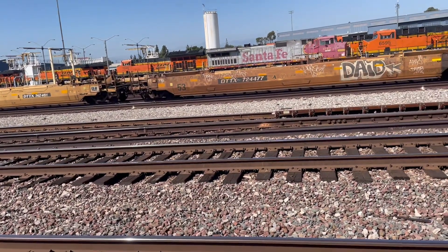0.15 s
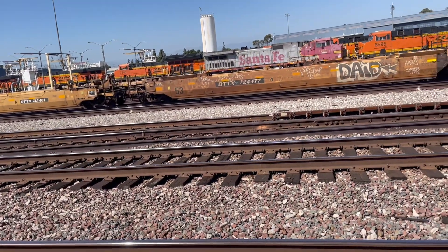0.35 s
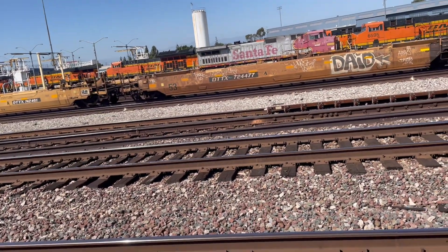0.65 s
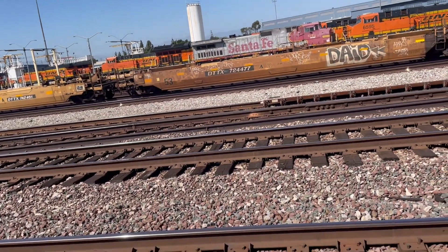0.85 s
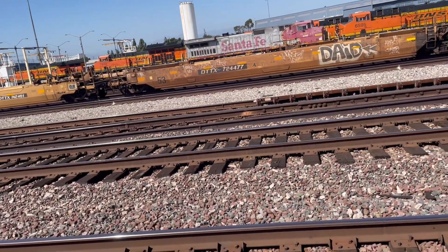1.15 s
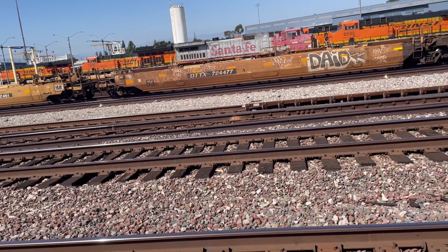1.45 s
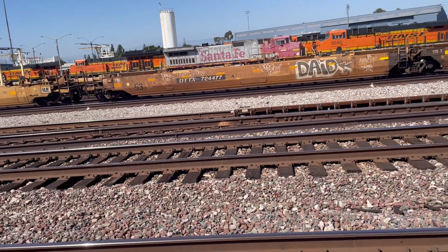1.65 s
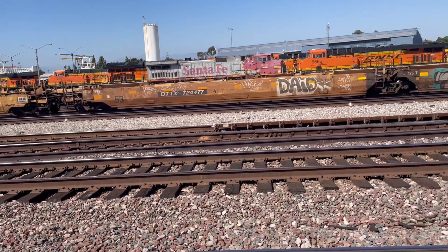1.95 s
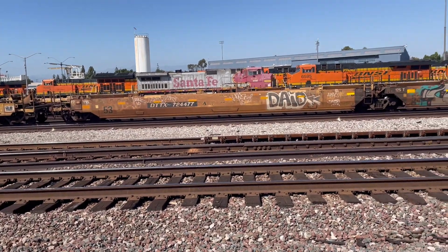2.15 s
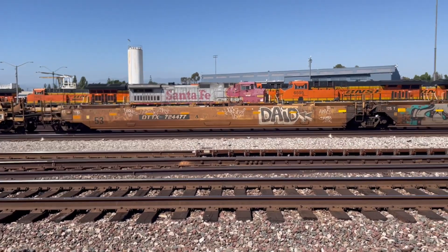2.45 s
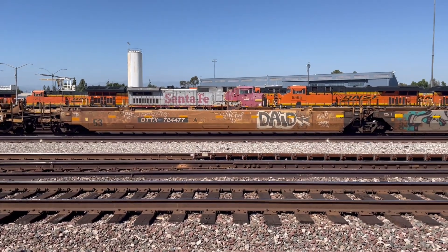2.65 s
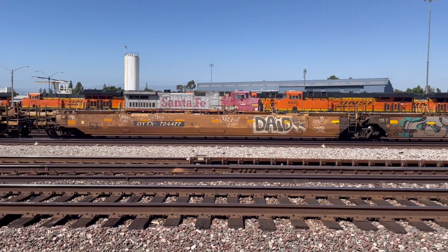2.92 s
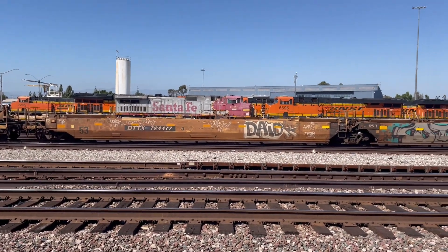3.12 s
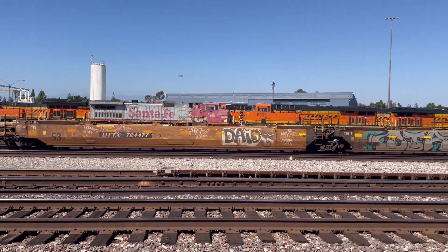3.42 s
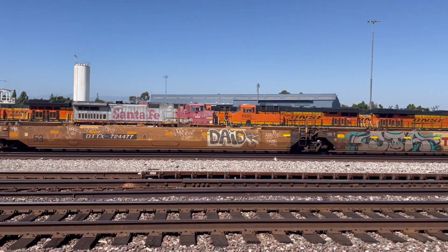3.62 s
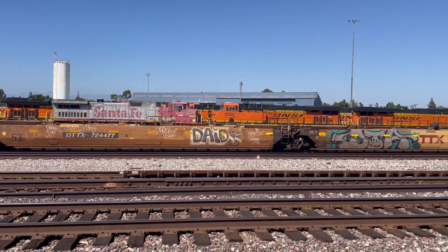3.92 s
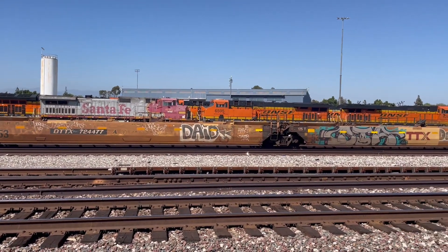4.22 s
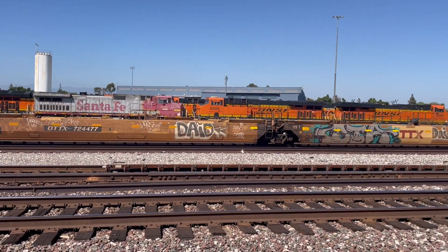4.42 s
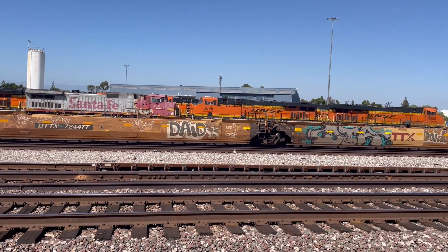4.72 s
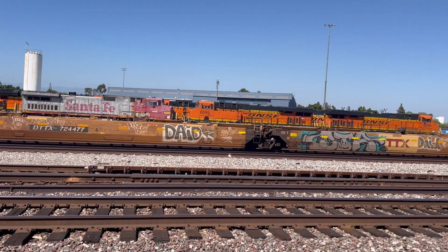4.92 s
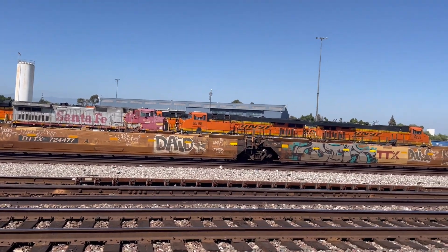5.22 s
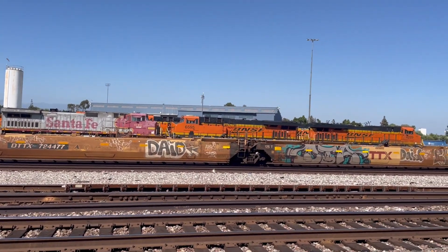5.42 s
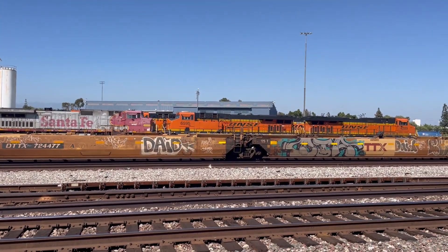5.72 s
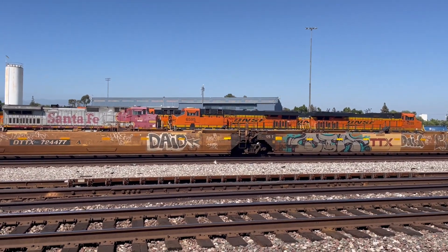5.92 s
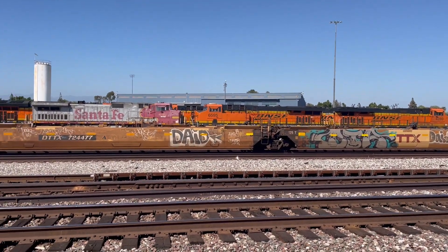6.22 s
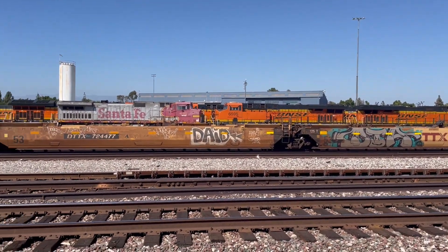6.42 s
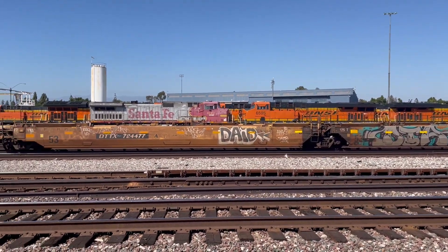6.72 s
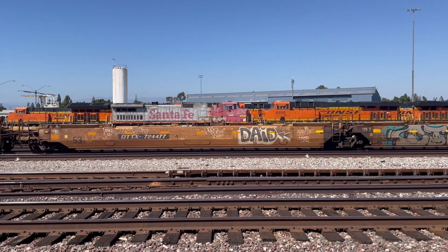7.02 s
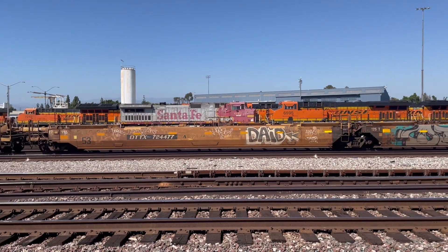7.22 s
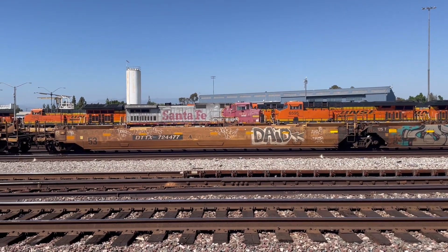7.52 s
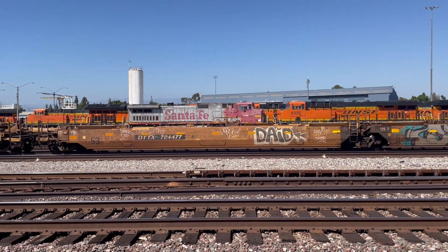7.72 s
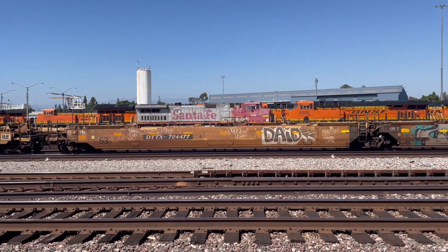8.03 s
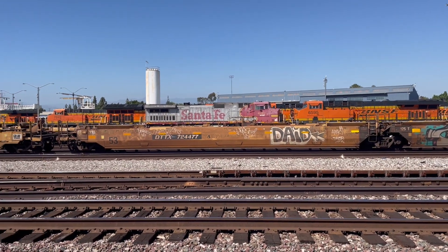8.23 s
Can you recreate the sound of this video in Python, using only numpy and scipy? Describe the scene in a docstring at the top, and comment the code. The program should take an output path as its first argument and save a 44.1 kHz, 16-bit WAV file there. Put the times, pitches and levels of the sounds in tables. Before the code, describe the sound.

Deep, pulsing diesel rumble and the even noise of steel wheels carry across an open rail yard as a freight train rolls slowly along. Wind hits the microphone in irregular low thumps, with stronger buffeting late on. Underneath are a soft wavering whine, faint bird chirps and two runs of dry ticking close by. A short hiss of escaping air comes near the end.

```python
"""A freight train creeps through a rail yard, heard on a stereo microphone several tracks away.
Its diesels throb and beat against each other over the roar of rolling wheels and a blower's whine.
Wind thumps and flutters on the microphone, compressed air hisses off to the left and something dry
rattles close by. A faint sizzle passes, and small birds chip and twitter in the background."""
import sys
import numpy as np
from scipy import signal
from scipy.fft import rfft, irfft, next_fast_len
from scipy.io import wavfile
from scipy.ndimage import uniform_filter1d, map_coordinates

SR = 44100
rng = np.random.default_rng(int(sys.argv[2]) if len(sys.argv) > 2 else 0)


def wav_out(sig):
    """Save sig, one row per channel (or a flat mono array), as 16-bit PCM at SR to the path in sys.argv[1]."""
    wavfile.write(sys.argv[1], SR, np.round(np.clip(np.atleast_2d(sig).T, -1, 1) * 32767).astype(np.int16))


N = 368676

# left-right likeness of the engine rumble and wheel roar in the stereo image: f/Hz, coherence
TRAIN_COHERENCE = [(60, 0.88), (120, 0.98), (240, 1), (470, 0.25), (950, 0.44), (1400, 0.27), (2200, 0.27),
                   (6500, 0.11), (8600, -0.57), (12000, 0.018)]
# left-right likeness of the air hiss and dry rattle in the stereo image: f/Hz, coherence (clipped to -1)
HISS_COHERENCE = [(2000, 0.21), (3500, -0.19), (4500, .1), (5600, 0.088), (6700, 0.22), (7700, -0.73),
                  (8700, -1.5), (10400, -0.14), (12000, .8)]


def diesels():
    """The loudest diesel throbs evenly, swelling the rumble; idling ones beat against its exhaust tone."""
    # the loudest exhaust tone and its sidebands: offset/pulse rates, relative level/dB
    lead_tones = [(-1, -33.5), (0, -27.5), (1, -30)]
    idling_tones = [(37.4, -44), (45.5, -38.5), (50.4, -33), (51.8, -29.5), (53.65, -39), (58.3, -37.5),
                    (60.15, -37.5), (65.0, -33.5), (105.6, -49), (136.6, -45)]  # exhausts of the other diesels: f/Hz, relative level/dB
    rumble_spectrum = [(15, -30.5), (25, -28.5), (38, 8), (48, 7.5), (62, -20), (80, 8), (105, 0),
                       (150, -6), (220, -18), (320, -19.5), (500, -30.5), (900, -66), (3000, -100)]  # bed of engine rumble: f/Hz, level/dB
    strength = [(0, -16.5), (.5, -3.5), (1.8, -2), (3.2, 1.5), (5.5, 1), (7.4, -.5), (8.36, 1.5)]  # all the engines together: t/s, gain/dB
    lead_hz, pulse_hz, first_throb_s, swing_db = 55.26, 8.12, .012, 4
    pulse = 2 * np.pi * pulse_hz * (clock() - first_throb_s)
    exhaust = 2 * np.pi * (np.cumsum(lead_hz + .05 * wobble(1)) / SR + rng.random())
    lead = sum(np.sqrt(2) * amp(db) * np.sin(exhaust + step * pulse) for step, db in lead_tones)
    others = sum(amp(db + 0.45 * wobble(1.9)) * sine(hz + 0.038 * wobble(0.923))
                 for hz, db in idling_tones)
    rumble = coloured(noise(patchy_db=0.5), rumble_spectrum, TRAIN_COHERENCE)
    rumble *= amp(-33 + swing_db * np.cos(pulse))
    return amp(curve(strength) + .7 * wobble(5)) * (lead + others + rumble)


def wheels():
    """Steel wheels roar on the rails, from both ends of the train and all around; their flanges rasp."""
    roar_spectrum = [(100, -23.5), (250, 4.5), (430, 1.5), (590, -4.5), (700, 0), (930, 0), (1130, -4.5),
                     (1280, -8), (1750, -10.5), (2200, -19), (3600, -24), (5000, -27), (6900, -31),
                     (8800, -43.5), (12400, -42), (14000, -67)]  # wheels on rails: f/Hz, level/dB
    roll_level = [(0, -44), (.6, -45.5), (1.2, -43), (3.7, -44.5), (6.8, -42.5), (8.36, -42.5)]  # rolling roar: t/s, relative level/dB
    train_ends = [(-.18, -6), (.44, -7)]  # right end, left end: lag at the right port/ms, relative level/dB
    flange_level = [(0, -70.5), (2.4, -62), (5, -57.5), (6.4, -52), (7.5, -60.5), (8.36, -59)]  # flanges rubbing on the rail: t/s, level/dB
    around = amp(-2.5) * coloured(noise(patchy_db=3), roar_spectrum, TRAIN_COHERENCE)
    direct = sum(amp(db) * beam(roar_spectrum, lag_ms) for lag_ms, db in train_ends)
    roar = amp(curve(roll_level) + 3.5 + 0.26 * wobble(10)) * (around + direct)
    rasp_spectrum = [(700, -34), (1200, -6.5), (1750, 2.5), (2900, -4), (3800, -14.5), (7000, -44.5)]
    rasp = coloured(noise(patchy_db=2.5), rasp_spectrum, coherence=[(2000, 0.15)])
    return roar + amp(curve(flange_level)) * rasp * pan(left_db=0.5)


def blower_whine():
    """A blower's harmonics waver and fade in and out; their echoes off the wagons differ at each port."""
    harmonics = [(2, -59), (3, -66.5), (4, -46), (5, -55.5), (6, -53.5), (8, -53), (9, -55), (10, -60.5)]  # partials of the whine: harmonic number, relative level/dB
    carry = [(0, -2.5), (1.1, 0), (1.5, 2), (5.6, 1), (6.4, -1), (7.3, -1.5), (8.36, 0.5)]  # how well it carries across the yard: t/s, gain/dB
    fundamental_hz = 116.5
    pitch = fundamental_hz * (1 + 0.0045 * wobble(20))
    fading = lambda: amp(-7.2 + 5 * np.tanh(wobble(13)))
    echo = lambda hz: amp(-9) * (wobble(24) * sine(hz) + wobble(45) * sine(hz))
    direct = sum(amp(db) * fading() * sine(k * pitch) for k, db in harmonics)
    scattered = [sum(amp(db) * echo(k * pitch) for k, db in harmonics) for _ in range(2)]
    return amp(curve(carry)) * (direct + np.array(scattered))


def wind():
    """The breeze flutters over the microphone; gusts buffet each port separately, the right one harder."""
    breeze_level = [(0, -49), (.35, -40), (.7, -40.5), (1.1, -41.5), (2, -30), (2.4, -34), (3.3, -28.5),
                    (5.1, -41.5), (6.3, -27.5), (7.1, -36), (8.36, -34.5)]  # breeze on the microphone: t/s, level/dB
    flutter_spectrum = [(30, -14), (70, 9.5), (140, -5.5), (250, -7.5), (400, -22), (700, -28), (1500, -64),
                        (4000, -100)]  # its flutter: f/Hz, level/dB
    gusts = [(1.33, -40.5, 0.093), (2.53, -32.5, 0.032), (3.22, -35.5, 0.067), (4.48, -35, 0.18),
             (6.0, -34.5, 0.38), (6.8, -23, 0.19), (7.6, -25, 0.21), (8.18, -24, 0.11)]  # gusts on the ports: t/s, level/dB, half-width/s
    gust_spectrum = [(18, -20.5), (45, -8.5), (90, 2.5), (150, -17), (300, -19), (700, -39), (3000, -100)]
    lull_db, lull_swing_db = -37, 4.5  # buffeting between gusts
    ripple = amp(5 * np.tanh(wobble(35)))
    lumps = amp(3 * np.tanh([wobble(14), wobble(14)]))
    flutter = unit(ripple * coloured(noise(patchy_db=2), flutter_spectrum, coherence=[(100, 1)]))
    buffeting = unit(lumps * coloured(noise(patchy_db=5), gust_spectrum, coherence=[(100, -0.63)]))
    force = amp(lull_db + lull_swing_db * wobble(1)) + swells(gusts)
    return amp(curve(breeze_level)) * flutter + force * buffeting * pan(left_db=-5)


def eddies():
    """Each eddy thumps the microphone, falling in pitch as it dies, with a ragged wake of turbulence."""
    hits = [(0.114, -23.5, 413), (0.151, -24.5, 311), (0.199, -29.5, 400), (.241, -26.5, 475),
            (0.279, -23.5, 576), (0.354, -25.5, 555), (0.409, -24.5, 338), (0.898, -23.5, 463),
            (0.965, -18, 377), (1.019, -28.5, 387), (1.252, -22, 296), (1.343, -27, 332),
            (1.386, -20.5, 420), (1.43, -34, 345), (1.581, -21.5, 318), (1.609, -20.5, 440),
            (1.698, -14.5, 334), (1.804, -20.5, 344), (1.904, -18.5, 337), (1.999, -17.5, 302),
            (2.069, -17, 279), (2.491, -13.5, 364), (2.602, -16, 307), (2.662, -17, 263),
            (3.14, -20.5, 303), (3.18, -12, 331), (4.243, -21, 327), (4.457, -12, 348), (4.468, -18, 317),
            (4.541, -12.5, 316), (4.547, -23.5, 617), (4.874, -21, 279), (5.867, -17, 264),
            (6.026, -10, 199), (6.161, -13, 131), (6.272, -11.5, 164.5), (6.688, -20, 378),
            (6.781, -19, 293), (8.058, -9.5, 333), (8.119, -9, 409), (8.163, -18.5, 241)]  # eddies striking the microphone: t/s, relative level/dB, starting f/Hz
    trail_s, trail_db, trail_ratio = .022, -7.5, .65  # each drags a weaker, lower one behind it
    delays = trail_s * (.5 + rng.random(len(hits)))
    trailing = [(s + delay, db + trail_db, hz * trail_ratio) for (s, db, hz), delay in zip(hits, delays)]
    thumps, wake = np.zeros(N), np.zeros(N)
    t = np.arange(SR // 6) / SR
    for s, db, hz in hits + trailing:
        pitch = 65 + (hz - 65) * np.exp(-t / 0.00789)
        push = (1 - np.exp(-t / 0.0031)) * np.exp(-t / 0.021)
        add(thumps, s, amp(db - 2.5) * push * sine(pitch))
        add(wake, s, amp(db - 4) * (1 - np.exp(-t / 0.0064)) * np.exp(-t / 0.018))
    wake_spectrum = [(35, -25), (80, 7.5), (170, -0.5), (320, -23.5), (500, -31.5), (1200, -63.5),
                     (3000, -100)]
    return thumps + wake * coloured(noise(patchy_db=1.5), wake_spectrum, coherence=[(100, 0.91)])


def flurries():
    """Fine turbulence on the microphone joins the eddies into a rolling flutter."""
    bursts = [(.16, -39, 0.032), (.27, -33.5, 0.018), (.4, -39.5, 0.051), (.98, -33.5, 0.05),
              (1.24, -35, 0.039), (1.41, -33, 0.035), (1.73, -28.5, 0.014), (2.53, -37.5, 0.013),
              (4.52, -34, .03), (5.98, -36, 0.056)]  # flurries: t/s, level/dB, half-width/s
    spectrum = [(60, -21), (140, 4.5), (320, -3.5), (520, -15.5), (900, -22.5), (3000, -86)]  # fine turbulence: f/Hz, level/dB
    tumble = amp(4 * np.tanh(wobble(60)))
    turbulence = coloured(noise(patchy_db=5), spectrum, coherence=[(100, 0.84)])
    return swells(bursts) * unit(tumble * turbulence)


def compressed_air():
    """Air leaks off to the left and escapes in surges; a bright spray rises and falls with the flow."""
    surges = [(6.09, 0.25, -54), (6.56, 0.089, -55), (7.485, 0.18, -41.5), (7.8, 0.2, -49),
              (8.24, 0.15, -52)]  # escapes of air: start t/s, time open/s, relative level/dB
    jet_spectrum = [(500, 4.5), (1200, 9.5), (1700, 1), (2300, 6), (3500, 3), (5200, 3), (6500, -5.5),
                    (8000, -11.5), (10000, -21.5), (12400, -25), (14000, -50.5)]  # hiss of the jet: f/Hz, level/dB
    spray_spectrum = [(3000, -10), (6500, -1), (8500, -5), (10000, -2.5), (12400, -10), (13500, -31)]
    attack_s, release_s, leak_db = 0.091, 0.11, -62.5
    spray_db, reference_flow_db = -47.5, -34  # the spray has this level at this flow
    flow = amp(leak_db)
    for s, open_s, db in surges:
        t = np.maximum(clock() - s, 0)
        build = 1 - np.exp(-t / attack_s)
        release = np.exp(-np.maximum(t - open_s, 0) / release_s)
        flow = flow + amp(db) * build * release
    around = amp(0.5) * coloured(noise(patchy_db=5.5), jet_spectrum, HISS_COHERENCE)
    direct = amp(-2.5) * beam(jet_spectrum, lag_ms=.27)
    jet = flow * amp(.5 * wobble(25) + .8 * wobble(180)) * (around + direct)
    spray_gain = amp(spray_db + 2.5 * wobble(60)) * (flow / amp(reference_flow_db)) ** 0.91
    spray = spray_gain * coloured(noise(patchy_db=4.5), spray_spectrum, HISS_COHERENCE)
    return (jet + spray) * pan(left_db=3)


def rattle():
    """Something loose and dry rattles close by; each tick is a burst of tiny clicks with a soft tail."""
    hits = [(1.194, -54.5), (1.244, -51), (1.265, -53), (1.376, -62), (1.573, -49), (1.594, -51),
            (1.64, -51), (1.695, -49), (1.744, -53), (1.97, -51), (1.998, -47.5), (2.035, -47),
            (2.078, -47.5), (2.137, -49), (2.202, -53), (2.256, -57), (2.313, -53), (2.39, -55),
            (2.42, -50), (2.477, -52), (6.306, -50), (6.342, -51), (6.7, -53), (6.73, -44.5), (6.785, -46),
            (6.839, -53), (7.009, -50.5), (7.068, -58), (7.112, -49.5), (7.133, -48.5), (7.178, -50.5),
            (7.232, -48)]  # runs of ticks: t/s, level/dB
    rustles = [(1.6, -61, 0.073), (2.2, -54, 0.25), (3.05, -56, 0.067), (3.392, -52, 0.04),
               (5.42, -53, 0.055)]  # soft rustles of the same dry stuff: t/s, level/dB, half-width/s
    spectrum = [(700, 2), (1700, 7.5), (2500, -1), (4400, -0.5), (6500, -9), (8500, -10.5), (10500, -13),
                (12400, -21), (14000, -41)]  # the dry clicks: f/Hz, level/dB
    clicks_per_s, tick_half_s, tail_s, tail_db = 5000, 0.0095, 0.0085, -10
    clicks = rng.standard_normal((2, N)) * (rng.random(N) < clicks_per_s / SR)
    grit = amp(wobble(150))
    ticks = swells([(s, db, tick_half_s) for s, db in hits])
    tails = swells([(s + tail_s, db + tail_db, tail_s) for s, db in hits])
    envelope = np.sqrt(ticks ** 2 + tails ** 2 + swells(rustles) ** 2)
    return envelope * unit(grit * coloured(clicks, spectrum, HISS_COHERENCE))


def chipping_bird():
    """A small bird in the yard repeats a pair of short, falling chips."""
    calls = [(.183, -60), (.53, -60), (.883, -62), (1.237, -59), (2.313, -58), (2.682, -58), (3.031, -61),
             (3.452, -59), (3.837, -56), (4.183, -61), (4.575, -57), (4.923, -60), (6.86, -61), (7.27, -61)]  # double chips: t/s, level/dB
    chip_s, spacing_s = .017, .052
    chips = np.zeros(N)
    progress = np.linspace(0, 1, int(chip_s * SR))
    for s, db in calls:
        for delay in (0, spacing_s):
            pitch = (4830 - 480 * progress ** 0.81) * (1 + 0.0092 * rng.standard_normal())
            add(chips, s + delay, amp(db + rng.standard_normal()) * np.sin(np.pi * progress) * sine(pitch))
    return chips


def whistling_bird():
    """A second bird, on the left, whistles once in an arch of pitch."""
    start_s, length_s = 5.592, .092
    top_s, top_hz, half_width_s = 5.63, 4480, .06
    arch = top_hz * np.exp(-.5 * ((clock() - top_s) / half_width_s) ** 2)
    progress = np.clip((clock() - start_s) / length_s, 0, 1)
    return amp(-56) * np.sin(np.pi * progress) * sine(arch + 70 * wobble(360)) * pan(left_db=12.5)


def far_birds():
    """Farther off, birds twitter in short, blurred notes whose pitch and level shake fast."""
    notes = [(0.412, -65, .008, 4600), (6.17, -63, 0.011, 4520), (6.582, -60, .018, 4700),
             (6.988, -58, .018, 4520), (7.237, -55.5, 0.0091, 4800), (7.468, -59, .009, 4830),
             (8.234, -59, 0.01, 4750)]  # twitters: t/s, level/dB, half-width/s, f/Hz
    shake_hz = 170
    return sum(swells([(s, db, half)]) * amp(2.5 * wobble(150)) * sine(hz + shake_hz * wobble(700))
               for s, db, half, hz in notes)


def sizzle():
    """A run of faint, scratchy spits in a soft hiss at the top of the treble."""
    spits = [(2.535, -73.5, 0.012), (2.594, -62, 0.013), (2.632, -72, 0.013), (2.718, -74, 0.023),
             (2.83, -72, 0.019)]  # thin, high spits: t/s, level/dB, half-width/s
    haze_s, haze_db, haze_half_s = 2.66, -78, .1
    spectrum = [(6000, -34), (10500, -1), (12500, 4.5), (14500, 0.5), (15800, -8.5)]
    scratch = amp(2 * wobble(200))
    hiss = coloured(noise(patchy_db=3), spectrum, coherence=[(1000, .8)])
    return swells(spits + [(haze_s, haze_db, haze_half_s)]) * unit(scratch * hiss)


def amp(db):
    """Decibels to gain."""
    return 10 ** (np.asarray(db) / 20)


def unit(x):
    """Scaled to rms 1."""
    return x / np.sqrt(np.mean(x ** 2) + 1e-20)


def along(points, hz):
    """Rows of f/Hz, value, read on a log frequency axis."""
    freqs, values = np.transpose(points)
    return np.interp(np.log(hz + 1), np.log(freqs + 1), values)


def clock():
    """The time of every sample in seconds."""
    return np.arange(N) / SR


def curve(rows):
    """Rows of t/s, value, read at every sample."""
    times, values = np.transpose(rows)
    return np.interp(clock(), times, values)


def swells(rows):
    """A gain curve of bell-shaped swells, from rows of t/s, level/dB, half-width/s."""
    return sum(amp(db) * np.exp(-.5 * ((clock() - s) / half) ** 2) for s, db, half in rows)


def wobble(rate):
    """A smooth random curve, rate knots a second."""
    return map_coordinates(rng.standard_normal(512), [clock() * rate], mode="wrap")


def sine(hz):
    """A tone of rms 1 that follows a pitch curve from a random phase."""
    return np.sqrt(2) * np.sin(2 * np.pi * (np.cumsum(hz) / SR + rng.random()))


def noise(patchy_db):
    """Two noises with drifting patches of random gain."""
    bins = signal.stft(rng.standard_normal((2, N)), nperseg=1024)[2]
    patches = uniform_filter1d(rng.standard_normal(bins.shape[1:]), size=5, axis=0)  # across frequency
    patches = uniform_filter1d(patches, size=10, axis=1)  # across time
    return signal.istft(bins * amp(patchy_db * unit(patches)), nperseg=1024)[1][:, :N]


def filtered(x, response):
    """x through a filter whose gain is response(hz)."""
    size = next_fast_len(N + SR // 2)
    return irfft(rfft(x, size) * response(np.fft.rfftfreq(size, 1 / SR)), size)[..., :N]


def coloured(pair, spectrum, coherence):
    """Two unrelated signals made stereo at rms 1, with this spectrum (f/Hz, level/dB) and coherence."""
    def mid_side_gains(hz):
        angle = np.arccos(np.clip(along(coherence, hz), -1, 1)) / 2
        return amp(along(spectrum, hz)) * [np.cos(angle), np.sin(angle)]
    mid, side = filtered(pair, mid_side_gains)
    return unit(np.array([mid + side, mid - side]))


def beam(spectrum, lag_ms):
    """A noise of rms 1 from one direction: it reaches the right port lag_ms after the left."""
    delay = lambda hz: np.exp(np.pi * 1j * hz * lag_ms / 1000 * np.array([[1], [-1]]))
    return unit(filtered(rng.standard_normal(N), lambda hz: amp(along(spectrum, hz)) * delay(hz)))


def pan(left_db):
    """Channel gains that put the left left_db above the right."""
    return amp([[left_db / 2], [-left_db / 2]])


def add(track, s, sound):
    """Mix a sound into a track at time s."""
    part = track[max(round(s * SR), 0):][:len(sound)]
    part += sound[:len(part)]


def scene():
    """The whole yard as it reaches the microphone."""
    train = diesels() + blower_whine() + wheels()
    wind_on_microphone = wind() + eddies() + flurries()
    small_noises = compressed_air() + rattle() + sizzle()
    birds = chipping_bird() + whistling_bird() + far_birds()
    return train + wind_on_microphone + small_noises + birds


def record(dry):
    """The microphone's two ports differ in gain and phase, notch the treble and cut off its very top."""
    balance = [(450, 1), (850, -2), (1150, 0.5), (1800, -1), (3000, 2), (4500, -1), (7000, -2.5),
               (10000, -2)]  # gain between the ports: f/Hz, left minus right level/dB
    lag = [(60, 0), (110, 0), (220, 0.79), (450, 0.31), (1000, 0.35), (2200, 0.045), (3000, 0.068)]  # phase between the ports: f/Hz, lag of the left/rad
    treble = [(5300, 1), (5550, -3.5), (6000, 1), (7200, 1), (7550, -4), (7950, 4.5), (8700, 0),
              (10000, -2.5)]  # notches and peaks of the microphone: f/Hz, level/dB
    top_hz = 15800
    mismatch = lambda hz: amp(along(balance, hz)) * np.exp(-1j * along(lag, hz))
    ports = lambda hz: mismatch(hz) ** np.array([[.5], [-.5]])  # half to each side
    return filtered(dry, lambda hz: ports(hz) * amp(along(treble, hz)) * (hz < top_hz))


dry = scene()
out = record(dry)
wav_out(out)
```